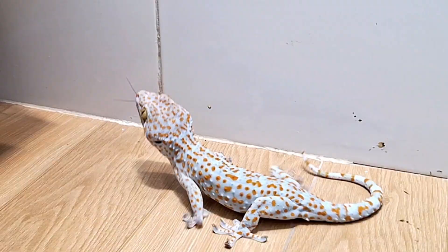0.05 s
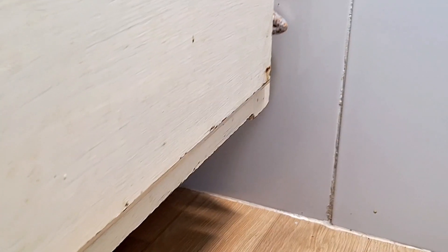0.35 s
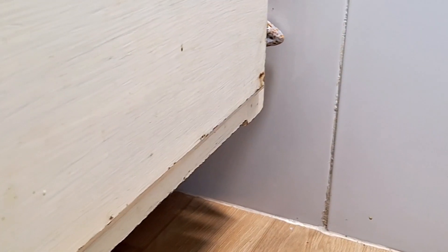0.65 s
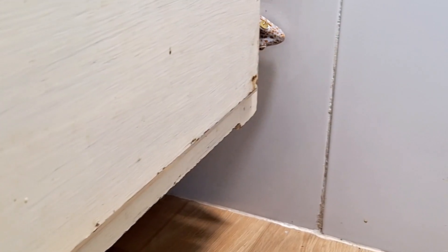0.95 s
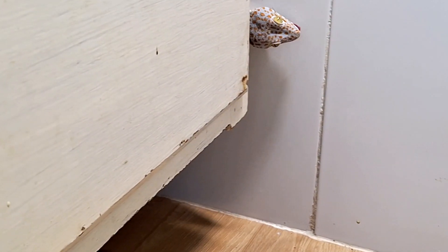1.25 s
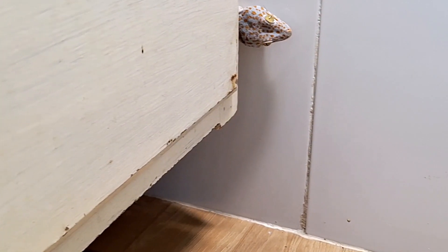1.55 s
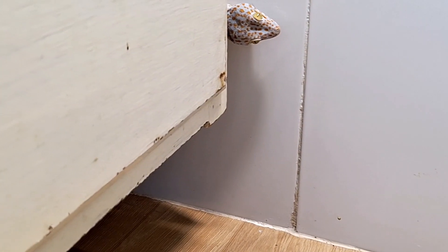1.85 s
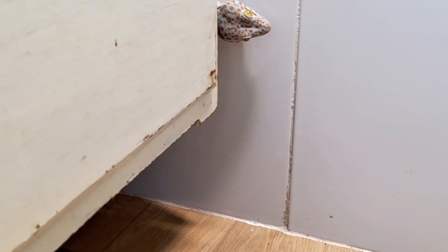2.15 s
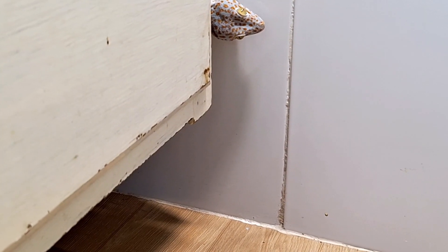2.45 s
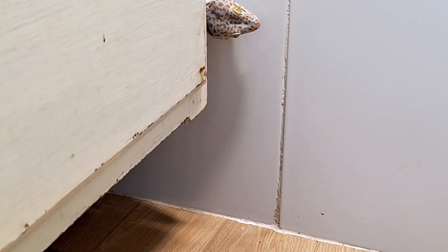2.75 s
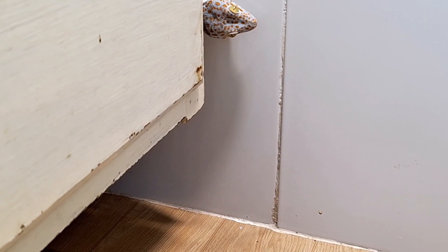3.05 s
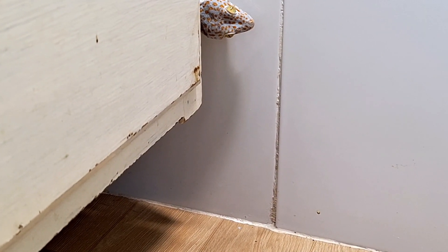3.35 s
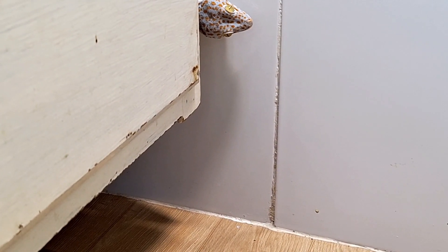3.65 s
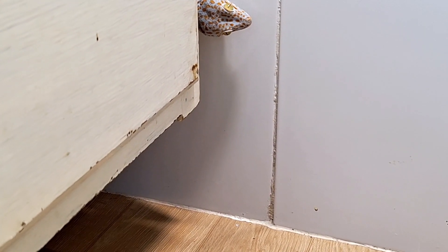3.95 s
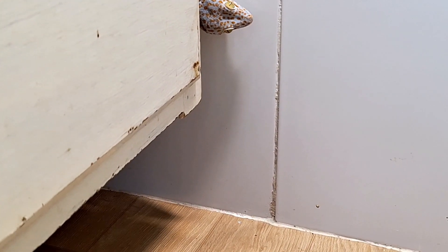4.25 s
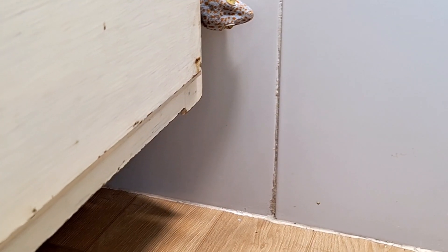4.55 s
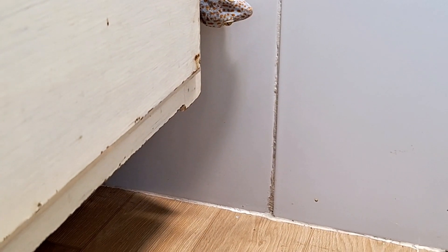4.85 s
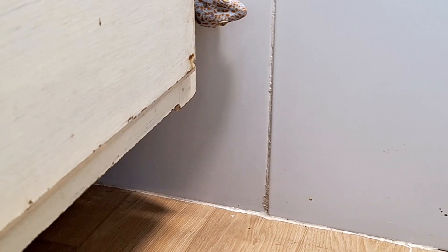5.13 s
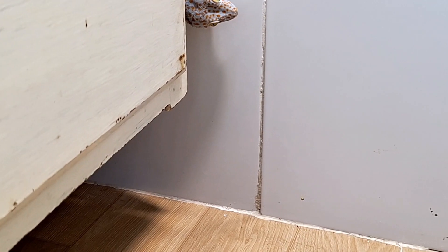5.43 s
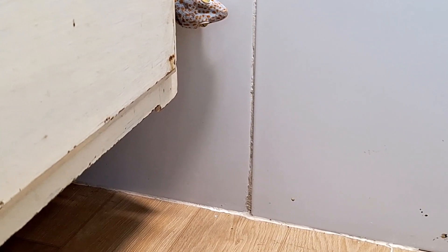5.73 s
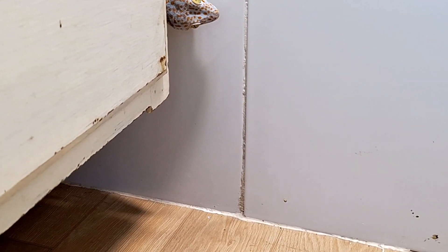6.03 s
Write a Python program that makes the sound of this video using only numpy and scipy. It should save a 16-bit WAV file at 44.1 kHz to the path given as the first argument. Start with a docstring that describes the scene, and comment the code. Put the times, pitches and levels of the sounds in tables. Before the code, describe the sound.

Indoors, a gecko's rapid rattling call is followed by hollow furniture bumps and two harsh barks over a low hum.

```python
"""A gecko behind a cupboard in a tiled room rattles ten short chucks, then barks twice.
Its larynx snaps in pulses that ring throat, mouth and chest; the pulse rate arches in every note.
Around the calls come hollow bumps on furniture, dry ticks, soft scuffs and thin squeaks,
then three faint low knocks and one short, thin chirp.
Under it all lies a bed of low machine hum, rumble and hiss."""
import sys
import numpy as np
from scipy import signal
from scipy.fft import rfft, irfft
from scipy.io import wavfile

SR = 44100
rng = np.random.default_rng(int(sys.argv[2]) if len(sys.argv) > 2 else 0)


def int16_out(signal):
    """Quantize to a 16-bit WAV file."""
    q = np.round(np.clip(np.atleast_2d(signal).T, -1, 1) * 32767)
    wavfile.write(sys.argv[1], SR, q.astype(np.int16))


N = 268569

# the rattle: t/s, length/s, crest position/0-1, crest pulse rate/Hz, level/dB, body send/dB, roughness/0-1
CHUCKS = [ (0.311, .03, 0.47, 238, -23, -5, 0.09), (0.417, 0.03, .53, 308.6, -21, -8.5, 0.13),
          (0.523, 0.025, 0.52, 321, -18.5, -10, 0), (0.626, 0.037, 0.58, 434.6, -22, -9.5, 0.11),
          (0.717, 0.05, 0.29, 421.5, -23, -9, 0.19), (0.8153, 0.046, 0.45, 457.6, -22.5, -9.5, 0.18),
          (0.9016, 0.058, 0.5, 441.4, -23.5, -7, 0.13), (1.005, 0.05, 0.47, 433.8, -23.5, -6.5, 0.16),
          (1.093, .054, 0.49, 439.7, -24.5, -4, 0.13), (1.189, .073, 0.32, 423, -24.5, -1, 0.11)]
# the barks: t/s, hold/s, release/s, pulse rate/Hz, level/dB, time to the opening push/s, push/dB
BARKS = [(3.53, 0.051, .045, 512, -23, .028, 9.5), (3.8597, .112, .105, 379.5, -25, 0.015, 7.5)]
# blows on furniture: t/s, ring gain/dB, attack/s, decay factor, tilt/dB per octave, scrape/dB, thud/dB
BUMPS = [(2.519, -31.5, 0.0013, 1.35, -4, -36.5, -31.5), (2.586, -19.5, 0.0021, 0.28, -7.5, -33, -25.5),
         (2.676, -11, 0.016, 0.39, -2.5, -31.5, -30), (3.555, -22.5, 0.0081, 0.32, 2, -54, -55)]
# the hollow panel's modes, before each blow tilts and damps them: f/Hz, level/dB, t60/s
PANEL_MODES = [(152, -8, 0.13), (389, 11, 0.077), (493, -13, 0.035), (622, 0.5, 0.086)]
# dry ticks: t/s, level/dB, f/Hz
TICKS = [ (1.454, -46.5, 4500), (2.461, -36.5, 2210), (3.0294, -36.5, 3600), (3.155, -47, 2600),
         (3.192, -39, 3430), (3.36, -44, 2370), (3.5391, -26.5, 3380), (3.686, -45, 4700),
         (4.169, -48.5, 6000), (4.752, -47, 9200), (4.772, -47, 11000), (4.823, -40, 11000),
         (4.835, -45, 2200), (6.017, -50, 2020)]
# soft scuffs: t/s, length/s, level/dB, f/Hz
SCUFFS = [(1.382, 0.16, -61, 4060), (1.551, 0.28, -58.5, 1380), (2.016, 0.13, -55, 6700),
          (2.22, .05, -52.5, 2220), (2.463, 0.076, -45, 2130), (2.495, 0.16, -56.5, 6900)]
# three faint low knocks, then one short, thin chirp: t/s, level/dB, f/Hz
KNOCKS_AND_CHIRP = [(4.185, -53.5, 550), (4.485, -47.5, 536), (5.22, -43.5, 278), (5.948, -50, 1376)]
# thin squeaks: t/s, length/s, f/Hz, level/dB
SQUEAKS = [(0.205, 0.065, 765, -54), (2.0, 0.24, 776, -51.5)]
# a squeak's first three harmonics: relative level/dB
SQUEAK_HARMONICS = [7, 8, -2]
# machine hum tones: f/Hz, level/dB
HUM_TONES = [(65, -48.5), (97, -49.5), (192, -65), (394, -70.5)]
# EQ curves of the rumble and the hiss: f/Hz, relative level/dB
RUMBLE_EQ = [(12, -75), (20, -19), (32, -38), (35, -1), (44, -17), (59, 5), (72, 6.5), (105, -12.5),
             (118, -10), (182, -14.5), (216, -23), (277, -27), (300, -37), (390, -77), (660, -120)]
HISS_EQ = [(150, -21), (250, -8.5), (386, -4.5), (413, -6), (483, -10.5), (585, -8.5), (684, -10.5),
           (786, -20), (1690, -24), (2080, -22), (2300, -24), (8030, -27), (15800, -37)]
# the tiled room's tail: f/Hz, t60/s
ROOM_DECAY = [(150, 0.14), (400, 0.37), (800, 0.6), (2200, 0.52), (5000, 0.54), (12000, 0.2)]
# early reflections off near walls: delay/s, relative level/dB
ECHOES = [(.0017, -20), (.0042, -12), (0.01, -14), (0.0146, -12)]


def gecko_voice(t, rate_hz, level_db, mouth_hz, mouth_width_hz, throat_hz, body_db, rough, length):
    """Larynx pulses, uneven in time and strength when rough, ring the mouth and body (throat, chest)."""
    cycles = np.cumsum(rate_hz) / SR
    count = int(np.interp(length, t, cycles)) + 1
    jitter, shimmer = rng.standard_normal((2, count))
    pulse_at = np.interp(np.arange(count), cycles, np.arange(len(t)))  # in samples
    index = pulse_at.astype(int)
    pulse_at = np.maximum(pulse_at + .2 * rough[index] * jitter * SR / rate_hz[index], 1)
    strength = amp(level_db[index] + 7.5 * rough[index] * shimmer)
    pulses = strength @ np.sinc(np.arange(len(t)) - pulse_at[:, None])
    # air leaks through with each pulse
    breath = rng.standard_normal(len(t)) * np.exp(-(cycles % 1) / .98) * (t < length)
    drive = pulses + amp(level_db - 24) * rough * breath
    mouth = resonate(drive, mouth_hz, mouth_width_hz, order=5)
    presence = amp(-30.5) * resonate(drive, 3980, width_hz=1250, order=3)
    throat = amp(-1.5) * resonate(drive * amp(body_db), throat_hz, width_hz=1000, order=4)
    chest = amp(-18) * resonate(drive * amp(body_db), 439, width_hz=296, order=3)
    # an antiresonance scoops the mids between throat and mouth: the nasal colour
    notch_hz, notch_width_hz = 1470, 380
    b, a = signal.iirnotch(notch_hz, notch_hz / notch_width_hz, fs=SR)
    return signal.lfilter(b, a, mouth + presence + throat + chest)


def gecko_rattle(mouth_width_hz=1480):
    """In each chuck the pressure swells and sinks, carrying pitch and loudness with it."""
    t, out = np.arange(4096) / SR, np.zeros(N)
    for start, length, crest, crest_hz, db, body_db, roughness in CHUCKS:
        arc = np.interp(t / length, [0, crest, 1], [-1, 0, 1])
        rising = arc < 0
        bend = 1 - np.where(rising, .26, .38) * arc ** 2
        level_db = db - np.where(rising, 3, 9) * arc ** 2
        throat_hz = 1080 * np.where(rising, 1, bend)  # darkens on the way down
        mouth_hz = 2293 + 18.5 * body_db  # more body, brighter mouth
        rough = np.full(len(t), roughness)
        chuck = gecko_voice(t, crest_hz * bend, level_db, mouth_hz, mouth_width_hz,
                            throat_hz, body_db, rough, length)
        add(out, start, chuck)
    return out


def gecko_barks(scoop=.3, sag=.26, fade_db=15.5, push_width_s=.0155, quiver_hz=12.3, mouth_width_hz=1460):
    """A bark opens with a push, holds a clear note, then sags, darkens and roughens as air runs out."""
    t, out = np.arange(SR // 3) / SR, np.zeros(N)
    for start, hold, release, hz, db, push_s, push_db in BARKS:
        length = hold + release
        onset = np.exp(-t / (.26 * push_s))
        effort_db = push_db * np.exp(-((t - push_s) / push_width_s) ** 2)
        spent = np.clip((t - hold) / release, 0, 1) ** 2
        quiver = .0064 * np.cos(2 * np.pi * quiver_hz * (t - push_s))
        rate_hz = hz * (1 - scoop * onset + .0032 * effort_db + quiver - sag * spent)
        level_db = db + effort_db - fade_db * spent
        mouth_hz = 2240 * (hz / 400) ** .35  # higher note, brighter mouth
        throat_hz = np.interp(t, [0, length], [970, 667])
        body_db = np.interp(t, [0, length], [-9.5, 2.5])
        rough = .007 + .12 * onset + .24 * spent
        bark = gecko_voice(t, rate_hz, level_db, mouth_hz, mouth_width_hz,
                           throat_hz, body_db, rough, length)
        add(out, start, bark)
    return out


def bumps(thud_hz=82, thud_t60=.85):
    """A soft blow rings the panel's modes and shakes the whole piece while the contact scrapes."""
    t, out = np.arange(SR // 2) / SR, np.zeros(N)
    pivot_hz = PANEL_MODES[1][0]
    for start, db, attack, decay, tilt_db, scrape_db, thud_db in BUMPS:
        ring = np.zeros(len(t))
        for hz, mode_db, t60 in PANEL_MODES:
            struck_db = db + mode_db + tilt_db * np.log2(hz / pivot_hz)
            ring += amp(struck_db - 60 * t / (t60 * decay)) * np.sin(2 * np.pi * hz * t)
        grit = band(len(t), 2200, octaves=.23) + amp(-3) * band(len(t), 650, octaves=1.8)
        scrape = amp(scrape_db - 60 * t / (.1 * np.sqrt(decay))) * grit
        thud = amp(thud_db - 60 * t / thud_t60) * np.sin(2 * np.pi * thud_hz * t)
        add(out, start, (ring + scrape + thud) * np.minimum(t / attack, 1))
    return out


def ticks(attack_s=.00043, t60=.041):
    """Dry little snaps of noise: sharp attack, quick decay."""
    t, out = np.arange(4096) / SR, np.zeros(N)
    for start, db, hz in TICKS:
        envelope = amp(db - 60 * t / t60) * np.minimum(t / attack_s, 1)
        add(out, start, envelope * band(len(t), hz, octaves=.8))
    return out


def scuffs():
    """Light rubbing: broad, soft puffs of noise."""
    out = np.zeros(N)
    for start, length, db, hz in SCUFFS:
        add(out, start, puff(length, db, hz, octaves=.56))
    return out


def knocks_and_chirp(length_s=.046, width_hz=51):
    """Three faint low knocks and one short, thin chirp, each a brief, narrow ring of noise."""
    out = np.zeros(N)
    for start, db, hz in KNOCKS_AND_CHIRP:
        add(out, start, puff(length_s, db, hz, octaves=np.log2(1 + width_hz / hz)))
    return out


def squeaks(waver=.015, fade_db=20.5):
    """Thin tones that waver and die away, each harmonic fluttering on its own."""
    out = np.zeros(N)
    for start, length, hz, db in SQUEAKS:
        t = np.arange(0, length, 1 / SR)
        cycles = np.cumsum(hz * (1 + waver * drift(SR, 90)[:len(t)])) / SR
        envelope = amp(db - fade_db * t / length) * signal.windows.tukey(len(t), .2)
        for k, harmonic_db in enumerate(SQUEAK_HARMONICS, 1):
            flutter = .7 + .6 * drift(SR, 30)[:len(t)]
            add(out, start, amp(harmonic_db) * envelope * flutter * np.sin(2 * np.pi * k * cycles))
    return out


def background(waver_hz=1.6, throb_db=2):
    """The bed: a wavering machine hum in low rumble, even hiss and a faint high whine."""
    hum = np.zeros(N)
    for hz, db in HUM_TONES:
        level = np.sqrt(2) * amp(db + throb_db * drift(N, .6))
        cycles = np.cumsum(hz + waver_hz * drift(N, 7.2)) / SR
        hum += level * np.sin(2 * np.pi * cycles)
    rumble = amp(-39.5) * noise(N, lambda f: curve(RUMBLE_EQ, f))
    hiss = amp(-57) * noise(N, lambda f: curve(HISS_EQ, f))
    whine = amp(-76) * band(N, 8160, octaves=.042)
    return hum + rumble + hiss + whine


def room(x, wet_db, echo_db, build_s=.011, taps_per_s=3000):
    """Single echoes off near walls, then a tail that builds up and dies at its own speed in each band."""
    taps = rng.choice([-1., 1.], SR) * (rng.random(SR) < taps_per_s / SR)
    taps *= np.minimum(np.arange(SR) / SR / build_s, 1)
    hz, t, spectrum = signal.stft(taps, SR, nperseg=256)
    decay = amp(-60 * t / curve(ROOM_DECAY, hz)[:, None])
    tail = signal.istft(spectrum * decay, SR, nperseg=256)[1]
    response = amp(wet_db) * tail / np.linalg.norm(tail)
    for delay, db in ECHOES:
        response[round(delay * SR)] += amp(db + echo_db)
    return x + signal.fftconvolve(x, response)[:N]


def resonate(x, hz, width_hz, order):
    """A sweepable resonance with steep skirts; a unit click rings to a peak near 1."""
    carrier = np.exp(2j * np.pi * np.cumsum(hz * np.ones(len(x))) / SR)
    pole = np.exp(-np.pi * width_hz / SR)
    baseband = x / carrier
    for _ in range(order):
        baseband = signal.lfilter([1 - pole], [1, -pole], baseband + 1e-18)
    return (carrier * baseband).real * np.sqrt(2 * np.pi * (order - 1)) / (1 - pole)


def puff(length, db, hz, octaves):
    """A soft band of noise that swells quickly and fades."""
    t = np.arange(SR // 2) / SR
    swell = np.sin(np.pi * np.minimum(t / length, 1) ** .5) ** 2
    return amp(db) * swell * band(len(t), hz, octaves)


def noise(size, db_at):
    """Noise of rms 1 with the EQ curve db_at(Hz)."""
    hz = np.fft.rfftfreq(size, 1 / SR)
    x = irfft(rfft(rng.standard_normal(size)) * amp(db_at(hz)), size)
    return x / np.sqrt(np.mean(x ** 2) + 1e-20)


def band(size, hz, octaves):
    """Noise in a bell-shaped band."""
    return noise(size, lambda f: -10 / np.log(10) * (np.log2((f + 1) / hz) / octaves) ** 2)


def drift(size, hz):
    """Random wander of rms 1, mostly slower than hz."""
    return noise(size, lambda f: -20 * np.log10(1 + (f / hz) ** 2))


def curve(points, hz):
    """Reads a table along log frequency."""
    f, value = np.transpose(points)
    return np.interp(np.log(hz + 1), np.log(f + 1), value)


def amp(db):
    """Decibels to gain."""
    return 10 ** (np.asarray(db) / 20)


def add(mix, start, sound):
    """Mixes a sound in at start seconds."""
    part = mix[round(start * SR):][:len(sound)]
    part += sound[:len(part)]


def scene():
    """Three groups, each with its own send to the tiled room, over the bed in mono."""
    calls = room(gecko_rattle() + gecko_barks() + squeaks(), wet_db=-10, echo_db=-3.5)
    small_noises = room(ticks() + scuffs() + knocks_and_chirp(), wet_db=-6.5, echo_db=-19)
    furniture = room(bumps(), wet_db=-11, echo_db=0)
    return (calls + small_noises + furniture + background())[None]


def record(dry, split_hz=900, ceiling=.085, knee=5, cut_in_s=.207, high_cut_hz=15900):
    """The treble overloads softly on the loudest notes; the sound cuts in after a moment of silence."""
    bass = signal.sosfiltfilt(signal.butter(2, split_hz, fs=SR, output="sos"), dry)
    treble = dry - bass
    saturated = treble / (1 + abs(treble / ceiling) ** knee) ** (1 / knee)
    fade_in = np.clip((np.arange(N) / SR - cut_in_s) / .004, 0, 1)
    high_cut = signal.firwin(511, high_cut_hz, window=("kaiser", 9), fs=SR)
    return signal.oaconvolve((bass + saturated) * fade_in, high_cut[None], "same")


dry = scene()
out = record(dry)
int16_out(out)
```